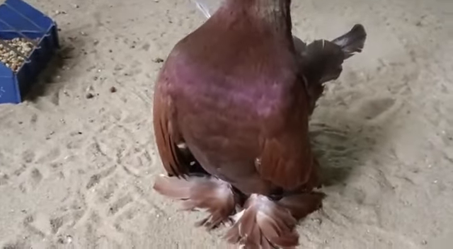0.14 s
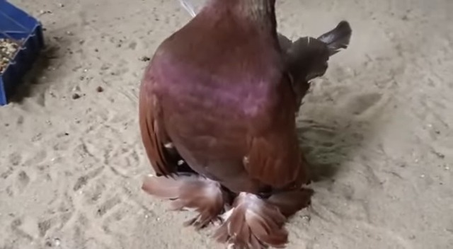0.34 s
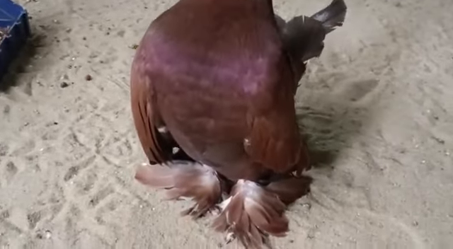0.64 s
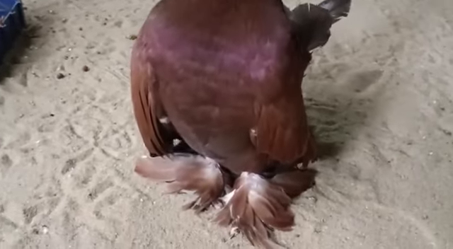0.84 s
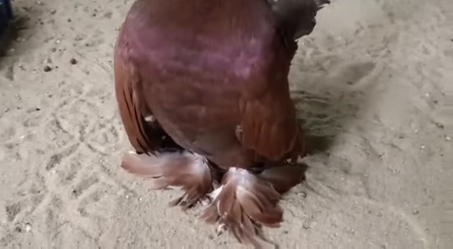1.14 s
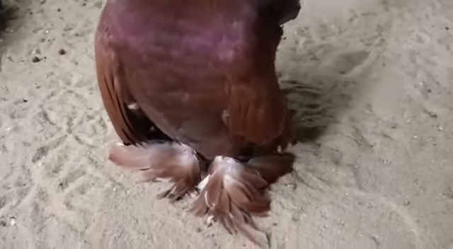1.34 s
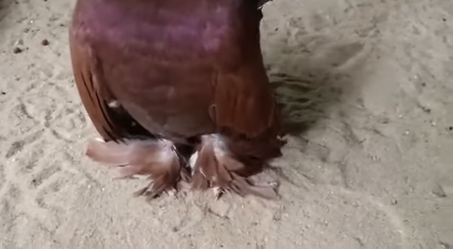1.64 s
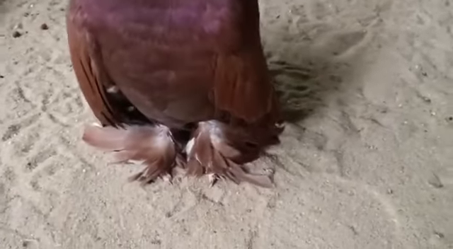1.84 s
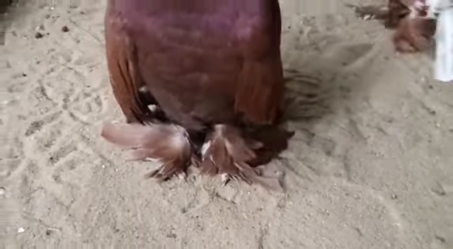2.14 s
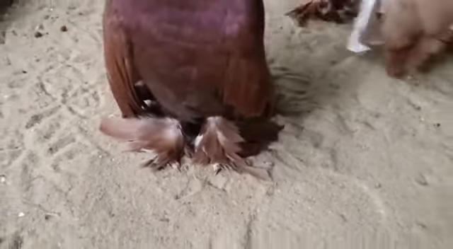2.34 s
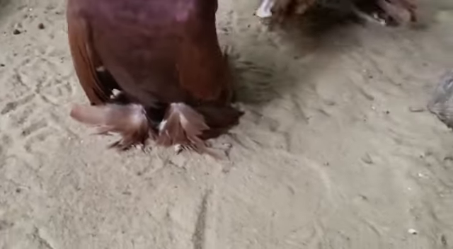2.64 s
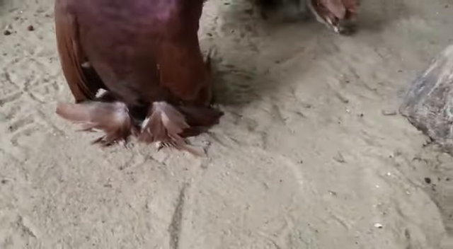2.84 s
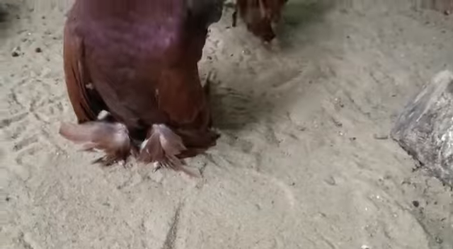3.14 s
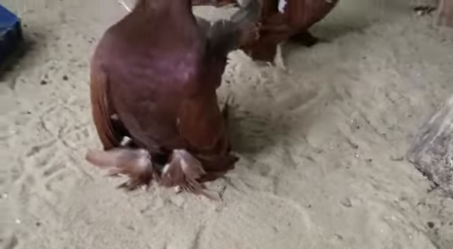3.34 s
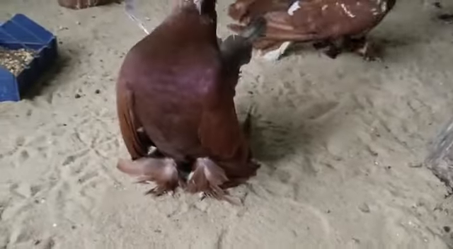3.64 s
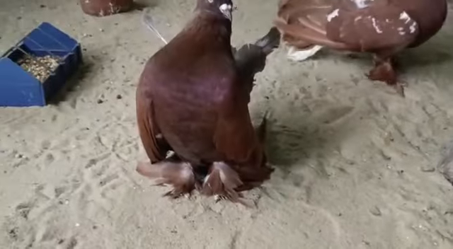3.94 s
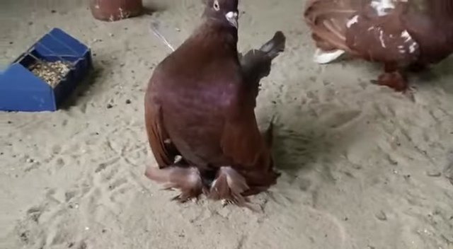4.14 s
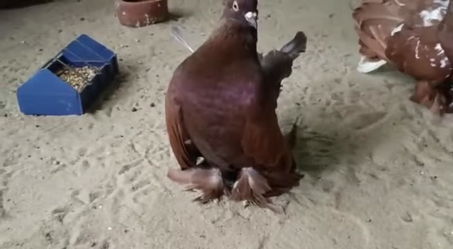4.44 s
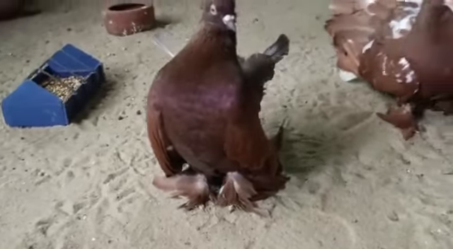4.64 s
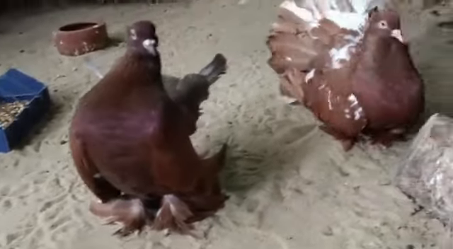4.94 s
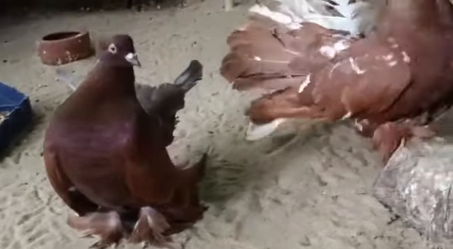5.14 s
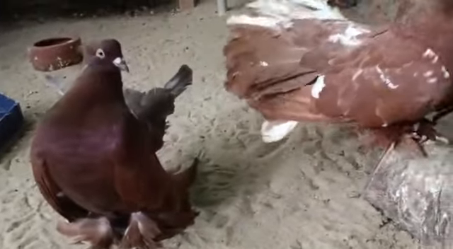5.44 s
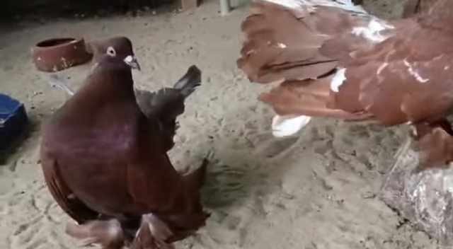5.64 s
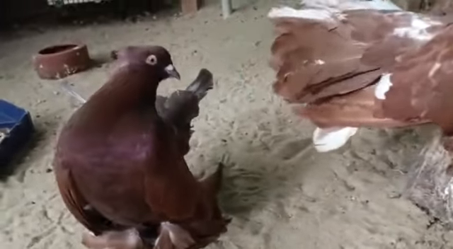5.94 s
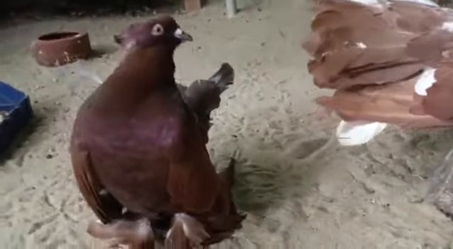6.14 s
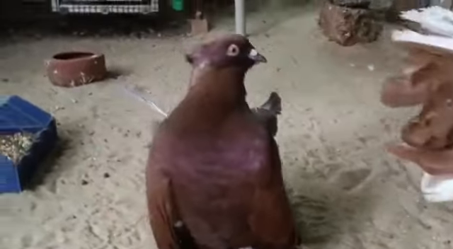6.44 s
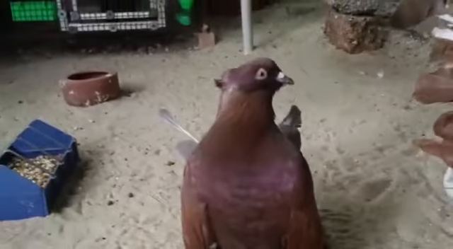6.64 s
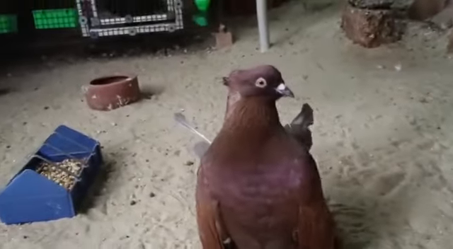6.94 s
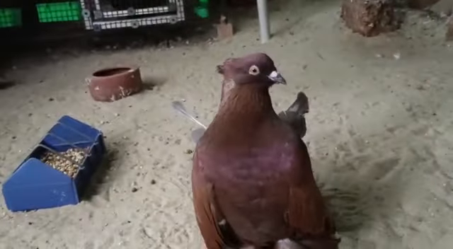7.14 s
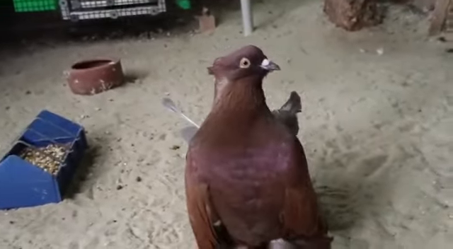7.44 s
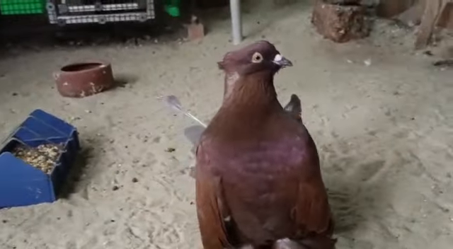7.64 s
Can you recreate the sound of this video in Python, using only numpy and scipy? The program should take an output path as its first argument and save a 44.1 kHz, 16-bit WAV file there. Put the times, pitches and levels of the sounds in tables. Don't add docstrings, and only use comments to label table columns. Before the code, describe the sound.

Close, hand-held phone sound in a small, fairly dry loft: breathy, closed-beak pigeon coos pulse rapidly, one bird lower, another slightly higher. Short gulps precede some phrases. Claws crackle on sand, wings buffet with low thuds, and feathers brush softly. After a sharp wooden knock come a high squeak and hoarse wheezes, then the strongest rolling coo, which sinks to quieter single coos over blurred flock murmur and low motor hum.

```python
import sys
import numpy as np
from scipy import signal
from scipy.fft import rfft, irfft
from scipy.io import wavfile
from scipy.ndimage import uniform_filter1d

SR = 44100
rng = np.random.default_rng(int(sys.argv[2]) if len(sys.argv) > 2 else 0)


def to_linear_factor(level_db):
    exponent = np.asarray(level_db, float) / 20
    return 10 ** exponent


def file_out(sig):
    cols = np.atleast_2d(sig).T
    lim = np.clip(cols, -1, 1)
    pcm = np.round(lim * 32767).astype(np.int16)
    wavfile.write(sys.argv[1], SR, pcm)


N = 343539
T = np.arange(N) / SR
F = np.fft.rfftfreq(N, 1 / SR) + 1


def unit(x):
    return x / np.sqrt(np.mean(x ** 2))


def colour(x, points):
    hz, db = np.transpose(points)
    return irfft(rfft(x) * to_linear_factor(np.interp(np.log(F), np.log(hz), db)), N)


def band(x, hz, width_hz):
    return irfft(rfft(x) * np.exp(-.5 * ((F - hz) / width_hz) ** 2), N)


def walk(rate_hz):
    return unit(band(rng.standard_normal(N), 0, rate_hz))


def wide(like_hz):
    mid, side = rfft(rng.standard_normal((2, N)))
    share = 1 / np.sqrt(1 + (like_hz / F) ** 2)
    return irfft([mid + share * side, mid - share * side], N)


def place(x, pan_db, lag):
    return np.array([np.roll(x, lag) * to_linear_factor(pan_db / 2), x * to_linear_factor(-pan_db / 2)])


def curves(table):
    rows = np.array(table)
    gate = np.clip(np.minimum(T - rows[0, 0], rows[-1, 0] - T) / 0.0067 + .5, 0, 1)
    return [np.interp(T, rows[:, 0], column) for column in rows[:, 1:].T], gate


def add(out, s, sound):
    i = int(s * SR)
    out[..., i:i + sound.shape[-1]] += sound[..., :N - i]


def room(x, t60, db):
    t = T[:SR // 3]
    tail = rng.standard_normal((2, len(t))) * np.exp(-np.log(1000) * t / t60) * (t > .004)
    return to_linear_factor(db) * signal.fftconvolve(x, tail / np.sqrt(np.sum(tail[0] ** 2)), axes=1)[:, :N]


def coo(throb_rows, skew, sag, jitter, overtone_db, breath_db, rasp_db):
    clear_from_s = 7.08
    s, hz, db, ms = np.transpose(throb_rows)
    push, bend = np.zeros(N), np.zeros(N)
    for at, peak, half in zip(s, to_linear_factor(db), ms / 1000):
        near = slice(max(int((at - 5 * half) * SR), 0), int((at + 5 * half) * SR))
        late = (T[near] - at) / half
        shape = peak * np.exp(-.5 * (late / np.where(late < 0, 1 - skew, 1 + skew)) ** 2)
        push[near] += shape
        bend[near] -= shape * late
    pitch = np.interp(T, s, hz) * (1 + sag * bend / (push + 1e-4) + jitter * walk(40.1))
    phase = 2 * np.pi * np.cumsum(pitch) / SR
    breath = to_linear_factor(breath_db - 10 * (T > clear_from_s)) * walk(60)
    tone = np.sin(phase) * (1 + breath) + to_linear_factor(overtone_db) * np.sin(2 * phase)
    rasp = to_linear_factor(rasp_db) * unit(band(rng.standard_normal(N), 343.5, 60))
    return push * (tone + rasp * (T < clear_from_s))


def throbs(notes, gap_s, duty, start_db, end_db):
    crop_hz, sink_db_per_octave = 290, -19
    rows = []
    for first, last, from_hz, to_hz, db in notes:
        x = np.linspace(0, 1, round((last - first) / gap_s) + 1)
        hz = from_hz + (to_hz - from_hz) * x
        swell_db = (start_db * (1 - x) ** 2 + end_db * x ** 2) * (len(x) > 2)
        sink_db = sink_db_per_octave * np.log2(np.maximum(crop_hz / hz, 1))
        half_ms = 1000 * duty * gap_s + 0 * x
        rows += zip(first + (last - first) * x, hz, db + swell_db + sink_db, half_ms)
    return rows


def song(rolls, glides, singles):
    return sorted(throbs(rolls, gap_s=.032, duty=.3, start_db=-0.6, end_db=-0.9)
                  + throbs(glides, gap_s=.043, duty=0.403, start_db=-3, end_db=-2.5)
                  + [(*row, 11) for row in singles])


def flutter(rows):
    gap = np.minimum(np.diff(np.array(rows)[:, 0], prepend=0, append=9), .04)
    return [(*row, 1000 * .3 * g) for row, g in zip(rows, (gap[1:] + gap[:-1]) / 2)]


def near_bird():
    # first t/s, last t/s, from f/Hz, to f/Hz, level/dB
    rolls = [(0.3663, .435, 296.7, 276, -30), (0.3008, 0.3346, 305, 295, -27)]
    glides = [(0.236, .27, 335, 320, -33.5), (0.489, .64, 309.7, 249.9, -36.5),
              (.815, 1.035, 345, 297.2, -33), (1.06, 1.16, 262.5, 220, -29),
              (1.417, 1.48, 396, 370.1, -36.5), (4.39, 4.48, 245, 205.4, -27),
              (7.215, 7.352, 323, 302, -27), (7.561, 7.686, 290, 301, -48.5),
              (7.72, 7.774, 345, 360, -48.5)]
    # t/s,
    # f/Hz, level/dB
    singles = [(.52, 325.6, -35), (4.452, 300, -31), (4.655, 330, -35), (6.053, 245.8, -27),
               (6.681, 305.3, -37), (7.116, 392, -40), (7.162, 344.8, -26), (7.41, 280, -33.5)]
    flutter_early = [(2.841, 298.7, -34.0), (2.869, 321, -33.0), (2.883, 306, -31), (2.907, 309.0, -28.0),
                     (2.931, 328, -26.5), (2.958, 343.0, -24.5), (2.985, 334.4, -26.5),
                     (3.015, 311.7, -25.0), (3.044, 325.3, -23.0), (3.062, 326.4, -22.0),
                     (3.085, 316.0, -35), (3.117, 301.8, -24.0), (3.15, 312.5, -26.5), (3.174, 297.0, -23),
                     (3.21, 279.5, -34), (3.247, 275.4, -34.5), (3.271, 281.0, -34.5), (3.296, 288, -32.5),
                     (4.163, 325.0, -30.0), (4.183, 312.0, -29.0), (4.21, 306.2, -24.0),
                     (4.237, 305.3, -24.5), (4.257, 286.5, -29), (4.283, 287.0, -22.5),
                     (4.303, 282.0, -33.5), (4.332, 271, -25), (4.352, 264, -28.5), (4.366, 263, -27.0)]
    flutter_late = [(4.917, 325.3, -31), (4.937, 318, -35), (4.954, 316, -37), (4.978, 308, -29.5),
                    (4.994, 294.5, -35.5), (5.015, 305.3, -29.5), (5.032, 325, -30.5), (5.051, 356, -29),
                    (5.073, 359, -29), (5.099, 320, -26), (5.118, 334.3, -30), (5.144, 319, -28.5),
                    (5.172, 312, -27), (5.196, 300, -28), (5.247, 311.3, -25), (5.28, 311.4, -23),
                    (5.312, 314.8, -26), (5.326, 336.1, -23.5), (5.342, 300, -29), (5.397, 351.4, -21),
                    (5.426, 303, -27), (5.448, 371, -32.5), (5.467, 336, -23), (5.589, 365.3, -30),
                    (5.615, 368, -29), (5.631, 344.6, -23), (5.657, 376.2, -27.5), (5.681, 382, -19),
                    (5.698, 345.3, -22), (5.726, 353, -22), (5.755, 355, -18), (5.786, 327, -21.5),
                    (5.81, 349, -20), (5.829, 341, -20), (5.861, 344.5, -20), (5.879, 343.7, -20.5),
                    (5.912, 348.8, -20.5), (5.943, 336, -21), (5.987, 309.8, -21.5), (6.009, 298.4, -22.5),
                    (6.024, 277, -27)]
    rows = sorted(song(rolls, glides, singles) + flutter(flutter_early) + flutter(flutter_late))
    return to_linear_factor(-.3) * coo(rows, skew=0.05, sag=0.03, jitter=0.022, overtone_db=-42, breath_db=-13, rasp_db=-15)


def chucks():
    # t/s, level/dB, f/Hz
    gulps = [(0.06, -33, 312), (0.117, -31.5, 303), (2.59, -30.5, 307), (2.659, -29, 311),
             (2.719, -31, 280), (2.775, -29.5, 289), (3.78, -33.5, 250), (3.89, -30, 306),
             (4.025, -27.5, 268), (4.729, -29, 312), (4.792, -31, 311), (4.853, -34.5, 296),
             (6.75, -32.5, 336), (6.822, -30.5, 298), (6.894, -33, 291), (6.973, -38, 305)]
    out = np.zeros(N)
    t = T[:4000]
    for s, db, hz in gulps:
        phase = 2 * np.pi * hz * (t + 0.14 * 0.011 * (1 - np.exp(-t / 0.0091)))
        puff = (1 - np.exp(-(t / 0.006) ** 2)) * np.exp(-t / 0.015)
        add(out, s - .003, to_linear_factor(db + 7.0) * puff * (np.sin(phase) + 0.25 * np.sin(1.3 * phase)))
    return out


def second_bird():
    # first t/s, last t/s, from f/Hz, to f/Hz, level/dB
    rolls = [(.211, .239, 402, 402, -37.5), (4.27, 4.31, 425, 439.7, -36.5), (4.34, 4.4, 510, 500, -34.5),
             (4.43, 4.465, 455, 420.8, -28), (4.801, 4.87, 452, 404.7, -39), (5.235, 5.27, 480, 469, -38),
             (5.59, 5.72, 470, 448.5, -31), (5.79, 5.86, 460, 454, -35.5)]
    glides = [(0.751, 0.792, 462.6, 423, -42), (1.001, 1.076, 465, 406.5, -32.5),
              (1.121, 1.216, 401.6, 328.2, -21.5), (1.258, 1.43, 315, 192.5, -26.5),
              (2.431, 2.52, 403.6, 398.7, -43), (2.719, 2.79, 500, 620, -53), (2.82, 2.86, 500, 560.3, -49),
              (2.891, 2.951, 530, 487, -47.5), (3.082, 3.19, 503.6, 507.7, -45.5),
              (4.964, 5.04, 496, 437.8, -33.5), (6.03, 6.061, 483.4, 488.8, -40),
              (7.723, 7.76, 512, 524.5, -54.5)]
    # t/s, f/Hz, level/dB
    singles = [(1.2, 345, -28), (4.139, 422, -30.5), (4.494, 462.3, -33.5), (4.58, 469.4, -30.5),
               (7.45, 391, -39.5)]
    rows = song(rolls, glides, singles)
    return coo(rows, skew=0.21, sag=.02, jitter=.012, overtone_db=-37.5, breath_db=-11.5, rasp_db=-24.0)


def high_glides():
    # first t/s, last t/s, from f/Hz, to f/Hz, level/dB
    glides = [(.06, 0.098, 640, 640, -56), (0.462, 0.482, 617, 621, -47.5),
              (3.114, 3.26, 609.4, 629.3, -54), (3.902, 4.049, 559.4, 502, -52),
              (4.897, 4.95, 629.8, 631, -51.5)]
    rows = song([], glides, [])
    return coo(rows, skew=0.11, sag=.02, jitter=.02, overtone_db=-37, breath_db=-4.0, rasp_db=-31)


def wings():
    # t/s, level/dB, swing f/Hz
    beats = [(1.494, -27, 238), (1.728, -29, 176), (1.761, -31, 75.6), (1.852, -14, 163),
             (1.868, -21.5, 70), (1.879, -18.5, 161), (1.899, -24, 237), (1.912, -20.5, 190),
             (1.9595, -10, 187), (2.004, -15, 125), (2.02, -17.5, 140), (2.035, -21.5, 228),
             (2.046, -19.5, 260), (2.1, -26, 248), (2.115, -22, 170), (2.132, -28, 199), (3.76, -44, 32)]
    out, gust = np.zeros(N), np.zeros(N)
    for s, db, hz in beats:
        t = T[:int(2.8 * SR / hz)]
        swing = np.cos(2 * np.pi * (hz * t - 1.4)) * np.hanning(len(t))
        add(out, s - .65 / hz, -to_linear_factor(db) * swing)
        add(gust, s, to_linear_factor(db) * np.exp(-T[:3000] / .028))
    rumble = to_linear_factor(-14) * unit(band(wide(900), 169, 97))
    deep = to_linear_factor(-25) * unit(band(wide(900), 62, 14))
    return place(out, -2.8, 11) + uniform_filter1d(gust, 200) * (rumble + deep)


def ring(hz, t60, size=3000):
    t = T[:size]
    return np.sin(2 * np.pi * hz * t) * np.exp(-np.log(1000) * t / t60)


def knock():
    # f/Hz, level/dB, t60/s
    modes = [(242.8, -6, 0.019), (700, -3, 0.006), (1260, -17, 0.0053), (2930, -10.5, 0.0063),
             (5400, -9.5, 0.0024)]
    knock_s, knock_db = 4.6815, -8.5
    out = np.zeros(N)
    t = T[:80] - T[40]
    add(out, knock_s, -sum(to_linear_factor(db) * ring(hz, t60) for hz, db, t60 in modes))
    add(out, knock_s - T[40], 1.3 * np.exp(-np.abs(t) / .00017))
    return place(out * to_linear_factor(knock_db), 7, -9)


def three_bands(x):
    # f/Hz, level/dB
    sand = [(290, -35), (600, 0), (1400, -13), (1950, -6.5), (3540, -5.5), (4470, -16), (9500, -30),
            (16000, -31)]
    x = colour(x, sand)
    return [unit(band(x, hz, width)) for hz, width in ((5000, 2800), (950, 740), (12520, 3790))]


def ticks():
    # t/s, level/dB, bright share/dB, left minus right/dB
    pecks = [(0.462, -53, -28, -1.1), (0.8546, -52.5, -14, 7), (1.961, -34, -28, -5), (7.113, -54, -30, -5),
             (7.281, -56, -30, -9), (5.4, -53, -27, 0), (6.984, -45, -14, 0), (5.497, -52, -25, 0),
             (3.426, -45.5, -24, 0), (4.2713, -45, -18, -6), (4.637, -43, -17, 19), (4.6679, -27.5, -31, 6),
             (5.9259, -41, -43, -22.5), (6.359, -39, -19, -13.5)]
    # t/s, level/dB, bright share/dB
    grit = [(0.5148, -32.5, 0), (1.076, -34, -1.5), (1.471, -33.5, 0), (1.494, -22, -11),
            (1.5378, -27, -7.5), (1.5992, -36, -8), (1.484, -38, -3), (1.521, -45, -12), (1.548, -39, -8),
            (1.5693, -46, -14), (1.6232, -43, -2), (1.69, -43, -6), (1.737, -29, 4.5), (1.8592, -40, 0),
            (2.049, -38, -6), (1.7838, -33, -7), (1.9918, -27, -3), (5.2359, -36.5, -3), (5.247, -41, -6),
            (5.2834, -45, -6), (3.645, -48, 0), (2.654, -51, -15), (2.96, -51, -10), (3.01, -55, -12),
            (5.72, -54, 1), (6.9232, -55, -2), (6.9536, -51, 1), (7.1945, -53, 2), (5.2975, -38, -2),
            (5.3221, -37.5, -10), (6.6149, -45, 2), (6.002, -45, -8), (7.08, -52, 2), (7.1209, -48, 1),
            (7.5114, -62, 17)]
    # t/s, left minus right/dB
    path = [(2.0, -2.5), (5.0, -10)]
    path_s, path_db = np.transpose(path)
    events = [(*row, 3) for row in pecks]
    events += [(*row, np.interp(row[0], path_s, path_db), -19) for row in grit]
    parts = three_bands(wide(1000))
    blow = np.zeros((3, 2, N))
    t = T[:1500]
    for s, db, bright_db, pan_db, dull_db in events:
        for part, rel_db, fade_s in zip(blow, (0, dull_db, bright_db), (.0015, .003, .001)):
            crack = (1 - np.exp(-t / 0.0006)) * (np.exp(-t / fade_s) + 0.2 * np.exp(-t / 0.012))
            add(part, s, place(to_linear_factor(db + rel_db - 3.5) * crack, pan_db, 0))
    return sum(p * g for p, g in zip(parts, blow))


def scuffs():
    # t/s, length/ms, level/dB, bright share/dB
    feet = [(0.282, 62, -60, -16), (0.46, 56, -69, -28), (1.74, 97, -60, -1), (1.851, 80, -47.5, -8),
            (1.946, 91, -45.5, -18.5), (2.03, 40, -52.5, -18), (2.092, 68, -54.5, -17),
            (3.352, 58, -67.5, 0.5), (3.561, 192, -52, -36), (4.12, 120, -57, -23), (4.349, 173, -62, -22),
            (4.619, 69, -59.5, -14), (5.361, 192, -63.5, -21), (6.95, 120, -70, 5.5), (7.04, 73, -70, 3),
            (7.319, 38.4, -64.5, -4.5)]
    feathers = [(0, 40, -56, -25), (0.921, 258, -61.5, -47), (1.08, 92, -65, -21), (1.129, 236, -63, -43),
                (1.47, 129, -52, -30), (3.19, 41.3, -62, -14), (3.278, 69, -56.5, -12.5),
                (2.15, 170, -75, -1), (3.535, 59, -62, -19), (3.63, 70, -68, -5), (3.86, 170, -61, -22),
                (4.59, 30, -69.5, -2), (4.755, 35, -66, -9), (4.92, 35.07, -68, -4), (1.6, 111, -66, -14),
                (1.66, 70, -69.5, 0), (2.0, 69.5, -63, 1), (2.1, 60, -65.5, 0),
                (4.969, 189.7, -55.5, -19.5), (5.219, 136.7, -60, -17), (5.74, 62.77, -60, -9.5),
                (5.981, 33.25, -62.5, -12), (6.37, 43, -63.5, -8), (7.549, 33.1, -60, -2)]
    events = [(*row, 4) for row in feet] + [(*row, -20) for row in feathers]
    grains = uniform_filter1d(to_linear_factor(1.3 * rng.exponential(size=N)) * (rng.random(N) < .05), 12)
    parts = three_bands(wide(900) * (1 + .4 * unit(grains)) * to_linear_factor(.8 * walk(60)))
    stroke = np.zeros((3, N))
    for s, ms, db, bright_db, dull_db in events:
        x = np.linspace(0, 1, int(1.55 * ms * SR / 1000))
        shares_db = np.array([[2.5], [dull_db + 0.5], [bright_db + 8.0]])
        add(stroke, s, to_linear_factor(db + shares_db) * np.sin(np.pi * x ** 0.57) ** 1.41)
    centres_hz = 400 * 1.45 ** np.arange(11)
    patchy = [sum(band(p, hz, .2 * hz) * to_linear_factor(2.5 * walk(25)) for hz in centres_hz) for p in parts]
    return sum(unit(p) * g for p, g in zip(patchy, stroke))


def scrapes():
    # t/s, length/ms, centre f/Hz, level/dB
    drags = [(0, 60, 5000, -64), (.455, 55, 4500, -63), (.89, 170, 3900, -63.5), (1.128, 46, 3968, -53.5),
             (1.13, 86, 6500, -68), (1.2, 77, 3200, -57.5), (1.888, 45, 1890, -46), (1.99, 14, 3500, -41),
             (2.125, 20, 2000, -49), (3.187, 30, 4620, -60.5), (3.28, 25, 4300, -55),
             (3.315, 56, 4700, -53.5), (3.534, 40, 5130, -53.5), (3.65, 180, 2810, -55.5),
             (4.76, 35, 7000, -64), (5.75, 50, 4510, -61), (7.33, 40, 3800, -63.5),
             (7.555, 39.6, 3200, -65), (.66, 60, 250, -50), (2.52, 60, 620, -61), (3.535, 70, 3300, -58),
             (4.035, 80, 6800, -69), (4.14, 65, 3300, -56), (6.61, 12, 2750, -56), (.3, 40, 3500, -63),
             (5.57, 60, 3900, -66), (5.37, 52, 1080, -57.5), (4.42, 58, 1050, -56.5),
             (5.925, 11, 1400, -46), (1.875, 45, 417, -36.5), (1.96, 19, 705, -35), (2.035, 29, 420, -34),
             (2.105, 36, 397, -41), (1.22, 30, 13500, -75)]
    width, rise_s = .16, 0.0036
    out = np.zeros((2, N))
    for s, ms, hz, db in drags:
        t = T[:int(2 * ms * SR / 1000)]
        edges = hz * (1 + width) ** np.array([-1., 1.])
        grains = rng.standard_normal((2, 16000)) * to_linear_factor(1.5 * rng.exponential(size=16000))
        resonance = signal.butter(2, edges, "band", fs=SR, output="sos")
        rough = unit(signal.sosfilt(resonance, grains))[:, :len(t)]
        add(out, s, to_linear_factor(db + 3.5) * rough * (1 - np.exp(-t / rise_s)) * np.exp(-(t * 1200 / ms) ** 2))
    return out


def hoarse(hz, gain, smear_hz, flutter_db, overtone_db, pan_db):
    phase = 2 * np.pi * np.cumsum(hz + smear_hz * walk(148.2)) / SR
    tone = (np.sin(phase) + to_linear_factor(overtone_db) * np.sin(2 * phase)) * to_linear_factor(flutter_db * walk(36))
    return place(tone * gain, pan_db, 10)


def calls(table, smear_hz, flutter_db, pan_db):
    out = 0
    for start, end, from_hz, to_hz, db in table:
        x = np.clip((T - start) / (end - start), 0, 1)
        swell = to_linear_factor(db + 3.0) * np.sin(np.pi * x ** 0.64)
        out = out + hoarse(from_hz + (to_hz - from_hz) * x, swell, smear_hz, flutter_db, -41.5, pan_db)
    return out


def young_birds():
    wheezes = [(-.3, .27, 2900, 2780, -60.5), (1.76, 2.82, 3090, 2790, -55), (2.7, 2.93, 2500, 2360, -71),
               (2.82, 3.12, 3080, 3130, -69.5), (3.13, 3.28, 2750, 2650, -61),
               (4.94, 5.04, 2600, 3200, -62), (5.0, 5.33, 3150, 2950, -53), (5.2, 5.76, 2960, 2790, -52),
               (3.08, 3.2, 4750, 4800, -77), (4.88, 5.0, 5200, 5180, -66), (6.62, 6.98, 1830, 1670, -62.5),
               (2.58, 2.74, 2960, 2930, -63), (5.74, 6.05, 2620, 2450, -70)]
    croaks = [(-.1, .5, 1890, 1750, -65), (.95, 1.5, 1797, 1710, -64), (7.05, 7.35, 1940, 1780, -68),
              (.66, .8, 2550, 3350, -70), (4.97, 5.2, 3350, 3150, -61), (1.63, 1.92, 1927, 1765, -54),
              (2.24, 2.8, 1760, 1690, -62.5), (2.76, 2.98, 1720, 1600, -61), (2.33, 2.92, 2080, 1740, -62),
              (4.25, 4.68, 1800, 1950, -57), (4.3, 4.6, 2150, 2050, -60), (4.55, 5.15, 1950, 1827, -63),
              (1.58, 1.86, 1320, 1255, -58)]
    return (calls(wheezes, smear_hz=64, flutter_db=2, pan_db=-1.8)
            + calls(croaks, smear_hz=105, flutter_db=2.4, pan_db=1.7))


def whistle():
    # t/s, f/Hz, level/dB
    squeak = [
        (4.64, 5020, -70),
        (4.69, 5170, -57),
        (4.8, 5200, -52),
        (4.91, 5160, -58),
        (4.95, 4950, -60),
        (5.01, 3900, -66),
    ]
    (hz, db), gate = curves(squeak)
    smear_hz = 12 + 2600 * np.clip(T - 4.89, 0, 1)
    return hoarse(hz, to_linear_factor(db) * gate, smear_hz, 1.2, -21, 2.5) * to_linear_factor(1.5)


def flock(db):
    out = np.zeros((2, N))
    for at, high, long, size, side in rng.random((700, 5)):
        t = T[:int((.03 + .07 * long) * SR)]
        hz = (250 + 290 * high) * (1 - .5 * t)
        note = np.sin(2 * np.pi * np.cumsum(hz) / SR) * np.hanning(len(t)) * to_linear_factor(-8 * size - 15.8 * high)
        add(out, at * N / SR, place(note, 6 * (side - .5), 9))
    return unit(out + room(out, 0.27, 0.52)) * to_linear_factor(db)


def nursery():
    bands = ((1820, -77), (2900, -80))  # f/Hz, level/dB
    return sum(unit(band(wide(900), hz, 110)) * to_linear_factor(db + 4 * walk(4)) for hz, db in bands)


def hum(db):
    # f/Hz, level/dB
    motor = [(97, 0), (170, -7)]
    lines = np.zeros(N)
    for hz, line_db in motor:
        phase = 2 * np.pi * np.cumsum(hz + 2.5 * walk(8)) / SR
        lines += to_linear_factor(line_db + 1.2 * walk(3.1)) * np.sin(phase)
    return place(lines * to_linear_factor(db), -.8, 20)


def loft_air():
    # f/Hz, level per Hz/dB
    spectrum = [(15, -32), (82, 1), (285, -3.5), (600, -26), (1900, -27.5), (3400, -30.5), (5500, -43),
                (15000, -51)]
    return unit(colour(wide(430), spectrum)) * to_linear_factor(-48) * to_linear_factor(1.32 * walk(2.5))


def whine():
    return unit(band(wide(900), 8250, 180)) * to_linear_factor(-83 + 3 * walk(2))


def scene():
    # t/s, flock level/dB, hum level/dB, coos left minus right/dB
    loft = [(0, -40, -49, -1.5), (.7, -43.5, -49.5, 0), (1.3, -42, -51.5, -2), (1.6, -50, -44.5, 0),
            (2.3, -52.5, -45.5, -2), (3.1, -39.5, -56, 0), (3.45, -57, -51.5, 1), (4.4, -40, -59, 0),
            (4.56, -48, -58, 1), (4.9, -41, -57, 0), (5.3, -46.5, -56, 0), (6.05, -39.5, -51.5, 0.5),
            (6.25, -61.5, -43.5, 2), (6.7, -49.5, -42.5, -1.5), (7.3, -56.5, -45.5, -1.5),
            (7.79, -66.5, -44, 1)]
    (flock_db, hum_db, pan_db), _ = curves(loft)
    birds = place(near_bird() + chucks(), pan_db, 12)
    birds = birds + place(second_bird(), pan_db, 9) + place(high_glides(), 1.5, 6)
    small = knock() + ticks() + scuffs() + scrapes()
    far = young_birds() + whistle()
    wet = room(birds, 0.045, -18.0) + room(small, 0.046, -13.0) + room(far, 0.18, 1.0)
    background = flock(flock_db) + nursery() + hum(hum_db) + loft_air() + whine()
    return birds + wings() + small + far + wet + background


def band_limit(x):
    return signal.sosfilt(signal.butter(12, 16630, fs=SR, output="sos"), x)


def record(dry):
    # f/Hz, level/dB
    mic_dips = [(8500, 0), (8950, -7), (9600, 0), (10400, 0), (11400, -9), (12400, 0)]
    left = colour(dry[0], [(4000, 0.0045), (9000, -7)])
    ports = colour(np.array([left, dry[1]]), mic_dips)
    top_cut = signal.ellip(8, .2, 60, 15600, fs=SR, output="sos")
    mix = signal.sosfilt(top_cut, ports)
    return band_limit(mix)


dry = scene()
out = record(dry)
file_out(out)
```